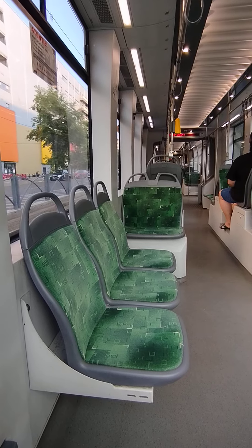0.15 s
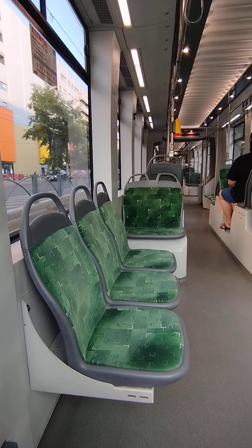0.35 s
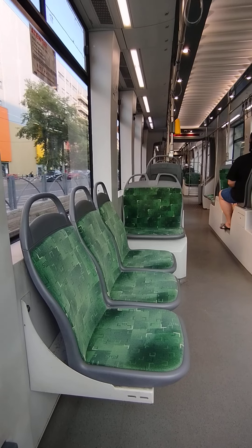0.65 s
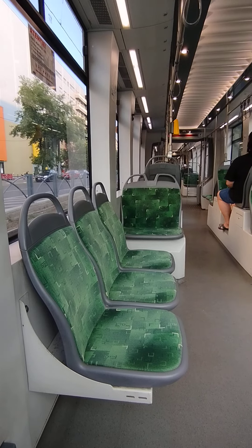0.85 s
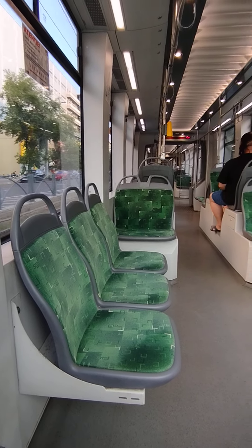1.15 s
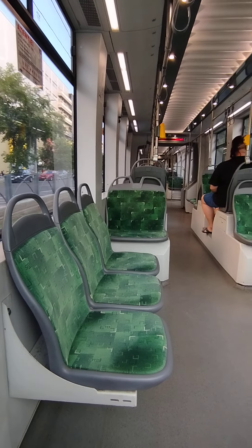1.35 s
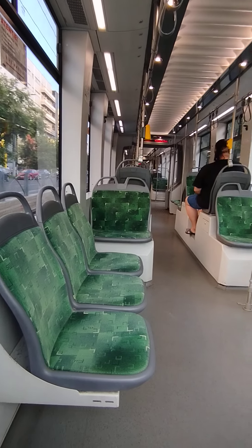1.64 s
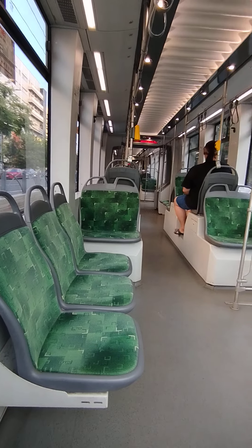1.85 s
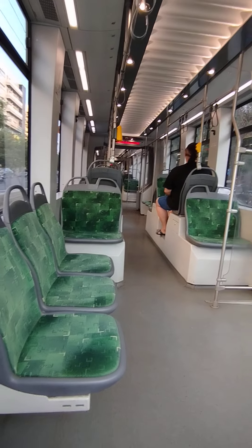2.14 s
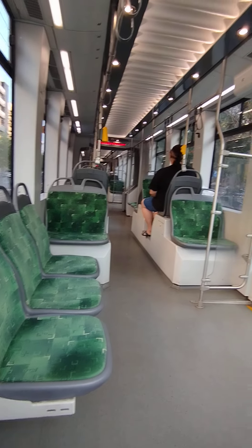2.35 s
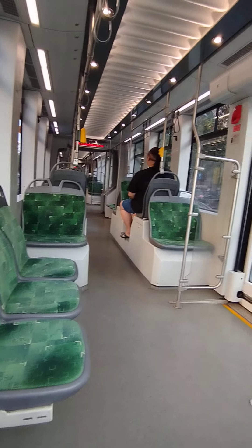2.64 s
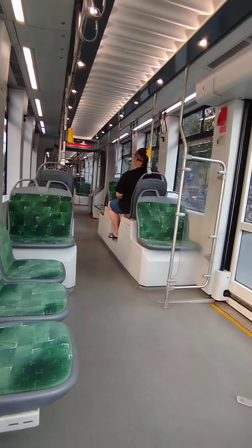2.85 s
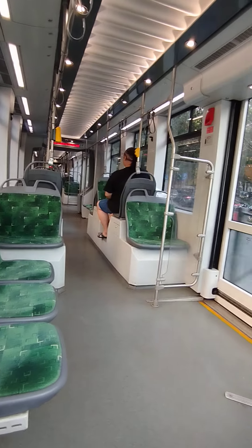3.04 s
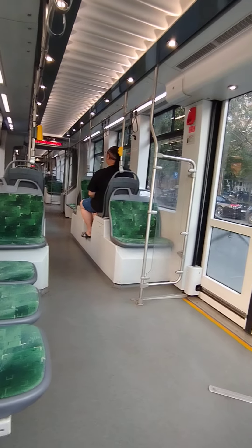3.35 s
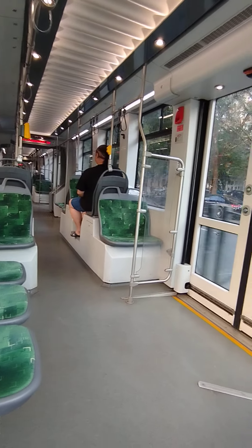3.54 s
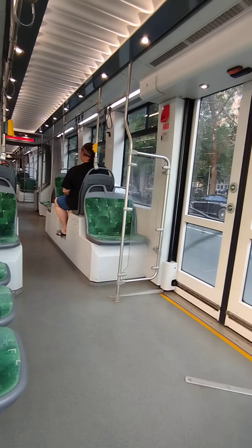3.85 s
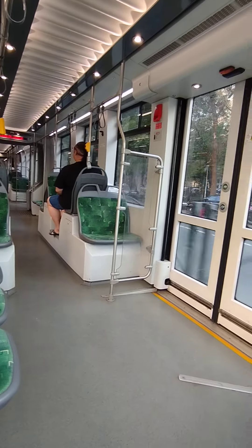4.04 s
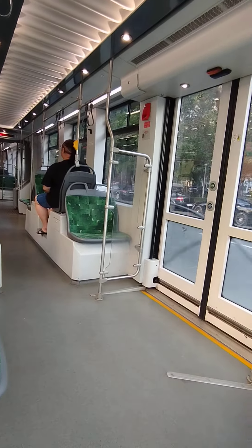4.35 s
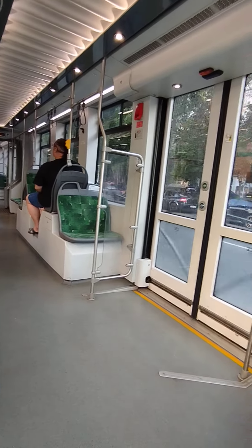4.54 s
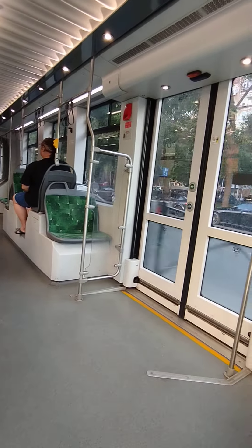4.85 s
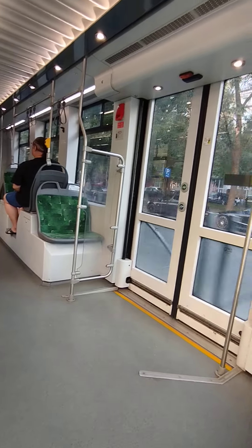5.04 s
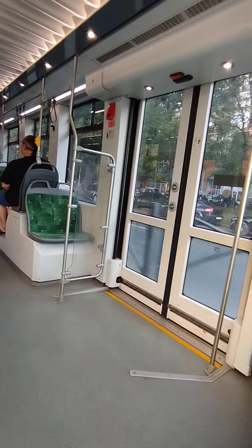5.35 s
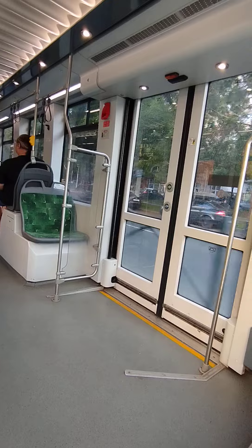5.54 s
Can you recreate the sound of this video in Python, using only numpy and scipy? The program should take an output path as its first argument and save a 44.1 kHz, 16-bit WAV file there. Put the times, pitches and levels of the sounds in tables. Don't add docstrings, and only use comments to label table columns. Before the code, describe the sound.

A handheld phone turns slowly in a quiet tram cabin. Continuous low rolling rumble, wavering deep boom, ceiling air hiss and faint gear and inverter whine fill the space. A rail joint jolts the floor after a second, with scuffing and rattling, then brushing cloth. A high tone comes forward mid-way, a few dry ticks follow, and the motor hum climbs at the end.

```python
import sys
import numpy as np
from scipy import signal
from scipy.fft import rfft, irfft
from scipy.io import wavfile
from scipy.ndimage import uniform_filter1d

SR = 44100
rng = np.random.default_rng(int(sys.argv[2]) if len(sys.argv) > 2 else 0)


def nominal_scale(level):
    x = np.asarray(level, float) / 20
    return 10 ** x


def wrap_up_sound(samples):
    columns = np.atleast_2d(samples).T
    tamed = np.clip(columns, -1, 1)
    steps = np.round(tamed * 32767).astype(np.int16)
    wavfile.write(sys.argv[1], SR, steps)


N = 251811
T = np.arange(N) / SR
F = np.fft.rfftfreq(N, 1 / SR) + 1e-3
SIDES = np.array([[.5], [-.5]])


def curves(table):
    s, *columns = np.transpose(table)
    return [np.interp(T, s, column) for column in columns]


def over_hz(table):
    hz, value = np.transpose(table)
    return np.interp(np.log(F), np.log(hz), value)


def unit(x):
    return x / np.sqrt(np.mean(x ** 2))


def walk(rate, count=1):
    hold = int(SR / rate)
    held = np.repeat(rng.standard_normal((count, N // hold + 1)), hold, axis=1)
    return 1.33 * uniform_filter1d(uniform_filter1d(held, hold), hold)[:, :N]


def bump(hz, octaves):
    return np.cos(np.clip(np.log2(F / hz) / octaves, -1, 1) * np.pi / 2)


def swells(rows):
    return sum(nominal_scale(db) * np.exp(-((T - s) / half) ** 2) for s, db, half in rows)


def resonances(rows):
    return nominal_scale(sum(db * np.exp(-((F - hz) / width) ** 2 * 2) for hz, width, db in rows))


# pitch_hz, correlation (-1 to 1)
PORT_LIKENESS = [(60, 0.99), (130, 0.95), (190, 0.97), (290, 0.71), (640, 0.42), (1410, -0.23),
                 (3100, 0.05), (6820, -0.12), (15000, -0.08)]
# pitch_hz, left_minus_right_db
PORT_BALANCE = [(60, -6), (110, -2), (200, -1), (380, -3), (700, -2.5), (1290, -5), (2380, -3.5),
                (4400, -2), (8120, 1), (15000, 5)]


def diffuse(source):
    likeness = np.clip(over_hz(PORT_LIKENESS), -.99, .999)
    mid, side = rfft(source)
    ports = np.sqrt(1 + likeness) * mid + 2 * SIDES * np.sqrt(1 - likeness) * side
    return ports * nominal_scale(SIDES * over_hz(PORT_BALANCE))


def bed(colour, swell_db, flicker_db):
    spectra = diffuse(rng.standard_normal((2, N))) * nominal_scale(over_hz(colour))
    centres = 2 ** np.arange(np.log2(colour[0][0]), np.log2(colour[-1][0]) + .4, .5)
    swell = uniform_filter1d(walk(3.9, count=len(centres)), 3, axis=0)
    drift_db = swell_db * swell + flicker_db * walk(10, count=len(centres))
    bands = np.array([irfft(spectra * bump(hz, 0.51) ** 2, N) * nominal_scale(db)
                      for hz, db in zip(centres, drift_db)])
    return centres, bands / np.sqrt(np.mean(bands.sum(0) ** 2))


def tone(hz, db, pan_db, fade_db, fade_rate, wander, apart):
    lag = SIDES * apart / 2 + wander * walk(fade_rate, count=2)
    phase = 2 * np.pi * (np.cumsum(hz * np.ones(N)) / SR + rng.random() + lag)
    pan = nominal_scale(SIDES * pan_db) / np.sqrt(np.cosh(pan_db * np.log(10) / 20))
    level = nominal_scale(db + fade_db * walk(fade_rate, count=2))
    return np.sqrt(2) * pan * level * np.sin(phase)


def facing(loudest_s):
    return 2.5 * np.cos(2 * np.pi * (T - loudest_s) / 5)


# pitch_hz, level_db per Hz
VENT_COLOUR = [(1000, 8.5), (1400, 3.5), (1700, -5), (2050, 3), (2600, -3), (3300, -8), (4500, -13.5),
               (5700, -13.5), (7200, -15.5), (9300, -17), (10200, -24), (11600, -25), (13200, -27),
               (14400, -24.5), (15700, -27)]


def vents():
    hiss = bed(VENT_COLOUR, swell_db=.35, flicker_db=.6)[1]
    return hiss.sum(0) * nominal_scale(-44)


CARRIER_HZ = 1800.6
# time_s, field_hz, level_db of its sixth-order torque ripple
FIELD = [(0, 44.35, -45.5), (1.2, 44.3, -46), (2.2, 44.0, -45), (2.8, 43.95, -43), (3.2, 44.05, -44),
         (3.8, 44.6, -48), (4.6, 45.55, -46), (4.95, 45.95, -40), (5.4, 46.35, -38.5), (5.71, 46.8, -38.5)]
# carrier_multiple, field_multiple, level_db, left_minus_right_db, loudest_s
COMB = [(2.0, -8.0, -73.6, -1.8, 0.0), (2.0, -6.0, -70.4, 2.7, 4.6), (2.0, -4.0, -72.5, 5.1, 4.4),
        (2.0, -2.0, -65.5, -2.3, 0.5), (2.0, -1.0, -68, -4.8, 4.4), (2.0, 1.0, -66.8, -5.3, 1.0),
        (2.0, 2.0, -69.5, -2.2, 1.1), (2.0, 4.0, -68, 5.0, 2.8), (2.0, 6.0, -68, -5.7, 1.7),
        (2.0, 8.0, -74.3, 1.8, 2.4), (3.0, -3.0, -72.9, -4.4, 1.7), (3.0, -2.0, -79.8, 8.3, 4.7),
        (3.0, -1.0, -72.3, 4.4, 1.6), (3.0, 1.0, -77, -3.9, 4.7), (3.0, 3.0, -71, -7.2, 2.3),
        (4.0, -8.0, -81.9, -5.9, 3.8), (4.0, -6.0, -73.5, -4.6, 5.4), (4.0, -4.0, -73.9, -3.5, 4.9),
        (4.0, -2.0, -67.7, -6.7, 1.9), (4.0, 0.0, -72.8, -1.3, 2.2), (4.0, 1.0, -74.1, -3.8, 3.7),
        (4.0, 2.0, -69, -3.6, 4.2), (4.0, 4.0, -67.2, -8.0, 1.6), (4.0, 6.0, -74.8, -6.2, 4.1),
        (4.0, 8.0, -73.7, -0.5, 4.2), (5.0, -5.0, -81.0, 0.3, 1.8), (5.0, -3.0, -68.5, 10.4, 1.8),
        (5.0, -1.0, -80.5, 9.0, 1.9), (5.0, 1.0, -82.4, 7.7, 4.6), (5.0, 3.0, -75.0, 1.1, 1.4),
        (5.0, 5.0, -69.5, 16.9, 2.2), (6.0, -8.0, -90.8, 14.5, 4.7), (6.0, -6.0, -87.6, 17.2, 1.8),
        (6.0, -4.0, -85.7, 6.6, 1.8), (6.0, -2.0, -91.7, 8.9, 1.9), (6.0, 2.0, -89.6, 11.0, 0.0),
        (6.0, 4.0, -85.4, 10.8, 1.3), (6.0, 6.0, -88.4, 11.2, 4.9), (8.0, -2.0, -85.7, 7.3, 1.7),
        (8.0, 2.0, -87.9, 7.0, 1.8)]
# pitch_hz, level_db, left_minus_right_db, loudest_s
CONVERTER = [(5851.5, -72.5, -2.5, 0.2), (5954, -83, 0, 3.8), (5988.1, -70, 2.5, 4.4), (6051, -78, 0, 3.6),
             (8062, -80, 0, 2), (9441, -80, 0, 1)]
# time_s, level_db, left_minus_right_db
HUM = [(0, -60, -4), (.15, -58.5, -4), (.36, -61, -4), (.48, -57.5, -1), (.72, -57.5, 0), (.85, -62, -1),
       (1.3, -68, -4), (1.7, -66, -3), (2.1, -58.5, -8), (2.55, -63, -9), (2.95, -58, -5), (3.3, -60, -3),
       (3.7, -63, -5.5), (4.3, -62, -5), (4.6, -59.5, -4), (5.1, -58, -3), (5.4, -57, -2), (5.71, -57, -1)]
# time_s, level_db, left_minus_right_db
SING = [(0, -63.5, 3), (.75, -68.5, 4), (1.2, -60, 9), (1.6, -63.5, 8), (1.95, -65, 8), (2.38, -60.5, 21),
        (2.8, -57, 21), (3.15, -59.5, 20), (3.6, -71, 3), (4.15, -70, -12), (4.8, -65.5, 1), (5.2, -63, 2),
        (5.71, -62, 1)]


def inverter():
    field_hz = curves(FIELD)[0]
    out = np.zeros((2, N))
    for carriers, fields, db, pan_db, loudest_s in COMB:
        hz = carriers * CARRIER_HZ + fields * field_hz
        out += tone(hz, db - 1 + facing(loudest_s), pan_db, 1.2, 1.5, wander=.03, apart=.4)
    for hz, db, pan_db, loudest_s in CONVERTER:
        out += tone(hz, db + facing(loudest_s), pan_db, 1, 1.2, wander=.04, apart=.3)
    for table, hz, fade_db in (HUM, 2 * CARRIER_HZ, 1.4), (SING, 2 * CONVERTER[2][0], .7):
        db, pan_db = curves(table)
        out += tone(hz, db, pan_db, fade_db, fade_rate=40, wander=.02, apart=.4)
    return out


# time_s, tooth_rate_hz, load_db, near_over_far_bogie_db
MESH = [(0, 271, -2, 2), (.4, 270.8, -1, 3), (1.1, 270.3, -1, 0), (1.6, 268.5, 0, -2), (2.5, 268, 0.5, 0),
        (3.4, 268.8, 1, 1), (3.7, 269.5, -3, 1), (4, 271, -3.5, -6), (4.5, 274.5, -8, 1), (5, 279.5, 2, 0),
        (5.71, 284.5, 4.5, 3)]


def gears():
    tooth_hz, load_db, near_db = curves(MESH)
    field_hz, ripple_db = curves(FIELD)
    far_share = .9655
    orders = [(6 * field_hz, ripple_db),
              (18 * field_hz, -57 + facing(1.8)),
              (3 * tooth_hz, -50 + .4 * load_db + near_db),
              (3 * far_share * tooth_hz, -52 - near_db)]
    return sum(tone(hz, db - 1, -2.5, 1.2, 4, wander=.02, apart=.15) for hz, db in orders)


# start_s, level_db, pitch_hz, bright_minus_peak_db, left_minus_right_db
TICKS = [(3.2958, -29, 690, -17, -6), (3.3200, -41, 1500, -12, -4), (3.3714, -34.5, 2900, 2, -7.5),
         (3.3716, -34, 1150, -40, -8), (3.5100, -37, 1600, -26, -5.5), (3.9302, -35, 2100, -40, -7),
         (4.5094, -43, 2200, -14, -3), (4.6962, -42, 2000, -20, -2.5), (5.0908, -41, 2050, -21, -3)]


def ticks():
    t = T[:int(.08 * SR)]
    out = np.zeros((2, N + len(t)))
    tails = rng.standard_normal((len(TICKS), 2, len(t)))
    for (s, db, hz, bright_db, pan_db), tail in zip(TICKS, tails):
        snap = np.sin(2 * np.pi * hz * t) * np.exp(-t * hz * .9)
        edge = nominal_scale(bright_db) * np.sin(2 * np.pi * 6800 * t) * t / .0001 * np.exp(-t / .0001)
        echo = nominal_scale(-19) * uniform_filter1d(tail, 6) * np.exp(-t / .012)
        start = int(s * SR)
        out[:, start:start + len(t)] += nominal_scale(db + 8.5 + SIDES * pan_db) * (snap + edge + echo)
    return out[:, :N]


# centre_hz, half_width_octaves, level_db
SCUFFS = [(.02, -45, 0.0083, 0.046), (1.2, -46, 0.078, 0.24), (1.32, -45, 0.0057, 0.054),
          (2.72, -45, 0.044, 0.13), (5.1, -48.5, 0.067, 0.077)]
SCUFF_BANDS = [(1740, 1.44, -10.5), (1460, 1.02, -5)]
WASHES = [(1.3, -55, .3, 0.39), (1.318, -45.5, .006, 0.039), (1.39, -70, 0.021, 0.028),
          (1.82, -50, 0.013, 0.016), (3.5, -58, .02, 0.042), (4.01, -54, 0.014, 0.05),
          (4.77, -56, .01, .02)]
WASH_BANDS = [(5100, 1.27, 0.1)]
BRUSHES = [(1.515, -56, .01, 0.025), (1.63, -53.5, 0.012, 0.077), (1.734, -45, 0.0023, 0.015),
           (1.755, -49, .008, 0.023), (1.79, -48, 0.013, 0.033), (1.853, -51, .005, .03),
           (3.479, -57.5, 0.0038, 0.057), (4.17, -60, 0.0095, .02), (4.45, -60, .04, .068),
           (5.7, -62, 0.011, 0.034)]
BRUSH_BANDS = [(7850, 0.61, -5.5), (9353, 0.27, -4.5), (12000, 0.16, -15), (13800, 0.26, -13),
               (4630, 0.99, -3.5)]
CHATTERS = [(1.2, -53, .05, .06), (1.26, -54, .04, .05), (1.319, -44, .004, .06), (1.372, -54, .01, .01),
            (2.05, -56, .05, .15), (2.79, -55, .02, .03), (3.05, -54, .12, .25), (5.1, -56, .05, .08)]
CHATTER_BANDS = [(2001, 0.23, -1.5), (2280, .9, -8.5)]
SQUEAKS = [(1.82, -50, 0.0046, 0.013)]
SQUEAK_BANDS = [(4900, 0.38, 0.1)]


def stroke(s, db, rise, fall):
    shape = np.where(T < s, ((s - T) / rise) ** 2, np.abs((T - s) / fall) ** 1.37)
    return nominal_scale(db) * np.exp(-shape)


def rustle():
    size_db = 1.7 * rng.exponential(size=(2, N // 60 + 1)).repeat(60, axis=1)[:, :N]
    spectra = diffuse(rng.standard_normal((2, N)) * nominal_scale(size_db))
    kinds = [(SCUFFS, SCUFF_BANDS), (WASHES, WASH_BANDS), (BRUSHES, BRUSH_BANDS),
             (CHATTERS, CHATTER_BANDS), (SQUEAKS, SQUEAK_BANDS)]
    out = 0
    for strokes, bands in kinds:
        sound = sum(nominal_scale(db) * unit(irfft(spectra * bump(hz, octaves), N)) for hz, octaves, db in bands)
        out = out + sound * sum(stroke(*row) for row in strokes)
    return out


# peak_s, level_db, half_length_s
THUMPS = [(0.0, -61, 0.14), (0.131, -61.4, 0.054), (0.938, -58.9, 0.07), (1.038, -47, 0.041),
          (1.147, -53.5, 0.025), (1.215, -46, 0.02), (1.301, -49.6, 0.028), (1.364, -43, 0.024),
          (1.441, -41, 0.034), (1.526, -63, 0.023), (1.772, -60, 0.06), (2.057, -61, 0.036),
          (4.79, -66, 0.112), (5.568, -62, 0.032), (5.71, -45, 0.028)]


def thumps():
    mid, side = (unit(irfft(rfft(rng.standard_normal(N)) * bump(44, 0.64), N)) for _ in range(2))
    return (mid + 2 * SIDES * nominal_scale(-23) * side) * (nominal_scale(-79) + swells(THUMPS))


# pitch_hz, level_db per Hz
ROLL_COLOUR = [(41, -61), (70, -76), (80, -42), (90, -11), (108, -12), (121, -9), (134, -9), (167, -10.5),
               (222, -13.5), (250, -14.5), (275, -16), (321, -17), (353, -16), (583, -19.5), (797, -20),
               (900, -29), (1800, -40), (2340, -67), (3960, -120)]
# peak_s, level_db re steady roll, half_length_s
JOINTS = [
    (.3, -15, 0.19),
    (1.22, 0.5, 0.12),
    (1.7, -27, 0.41),
    (2.7, -13, 0.024),
    (5.15, -19, 0.052),
    (5.7, -20, 0.22),
]
# pitch_hz, width_hz, gain_db
CAR_MODES = [(199, 4.7, 3), (226, 12.4, -7), (274, 9, -3.5), (303, 24, 1.5), (322, 9.8, -2.5),
             (418, 10.5, 3), (443, 8.6, -2.5), (459, 15, 3), (498, 7.8, 0), (598, 25, -2.5), (629, 9, 6),
             (710, 33, 3.5), (770, 16, 0.5), (806, 11, -3)]


def wheels():
    rough = swells(JOINTS)
    centres, bands = bed(ROLL_COLOUR, swell_db=.5, flicker_db=.7)
    upper_share = np.clip(np.log2(centres / 250), 0, 1)[:, None, None]
    low, upper = (bands * (1 - upper_share)).sum(0), (bands * upper_share).sum(0)
    low, upper = irfft(rfft([low, upper]) * resonances(CAR_MODES), N)
    low = unit(low) * nominal_scale(-33) * (1 + nominal_scale(-2) * rough)
    upper = unit(upper) * nominal_scale(-36.83) * (1 + nominal_scale(-1.5) * rough)
    return low + upper


def ring(kicks, rest_db, nudge_hz, side_db, pan_db):
    s, db, half, hz = np.transpose(kicks)
    size = nominal_scale(rest_db) + swells(zip(s, db, half))
    phase = 2 * np.pi * np.cumsum(np.interp(T, s, hz) + nudge_hz * walk(30)[0]) / SR
    mid = np.sqrt(2) * nominal_scale(0.35 * walk(40)[0]) * np.sin(phase)
    side = nominal_scale(side_db) * unit(irfft(rfft(rng.standard_normal(N)) * bump(hz.mean(), 0.28), N))
    return size * (mid * nominal_scale(SIDES * pan_db) + 2 * SIDES * side)


# peak_s, level_db, half_length_s, pitch_hz
BOOM_KICKS = [(0.057, -32.5, 0.026, 108.8), (0.308, -36, 0.033, 115.5), (0.408, -35, 0.019, 108.8),
              (0.683, -43, 0.022, 108.4), (0.839, -36, 0.12, 110.6), (1.027, -37, 0.022, 109.8),
              (1.082, -38, 0.016, 112.6), (1.143, -39, 0.024, 108.4), (1.211, -35, 0.023, 105.6),
              (1.367, -28, 0.033, 107), (1.451, -32.5, 0.025, 110), (1.544, -24, 0.028, 112),
              (1.658, -35.3, 0.017, 110), (1.717, -32, 0.022, 110), (1.769, -36.5, 0.038, 108.6),
              (1.862, -23, 0.036, 106), (1.93, -27.5, 0.033, 111.2), (1.989, -27, 0.019, 112),
              (2.05, -37, 0.024, 113), (2.143, -35.5, 0.03, 110), (2.215, -30.5, 0.027, 111.8),
              (2.293, -38, 0.021, 108.6), (2.449, -32.9, 0.051, 112), (2.617, -39, 0.018, 108.8),
              (2.68, -26, 0.03, 108), (2.73, -29.5, 0.031, 108.8), (2.823, -28.5, 0.032, 108),
              (2.955, -41, 0.039, 110.5), (3.039, -31.5, 0.039, 111.5), (3.156, -32, 0.038, 106.7),
              (3.229, -27.5, 0.038, 109.6), (3.322, -30.5, 0.027, 104.5), (3.424, -34, 0.022, 112.7),
              (3.621, -30.5, 0.05, 107), (3.723, -32.5, 0.026, 105), (3.766, -35.0, 0.023, 105),
              (3.982, -34, 0.039, 109.1), (4.181, -36, 0.03, 113.2), (4.24, -31, 0.033, 109),
              (4.345, -30.5, 0.033, 106.7), (4.662, -30, 0.078, 110.5), (4.83, -36, 0.037, 106),
              (4.95, -22, 0.028, 109), (5.283, -29, 0.036, 109.2), (5.401, -31, 0.029, 111.3),
              (5.447, -37, 0.02, 110), (5.512, -38, 0.023, 108), (5.571, -32, 0.029, 104.5),
              (5.628, -29, 0.03, 109), (5.692, -28.5, 0.021, 107.2)]
# peak_s, level_db, half_length_s, pitch_hz
FLOOR_KICKS = [(0.113, -33.5, 0.04, 163.5), (0.24, -36.6, 0.024, 164.5), (0.454, -33, 0.024, 166.1),
               (0.816, -29, 0.018, 164.9), (0.927, -38.7, 0.022, 183.9), (1.041, -31.5, 0.026, 176),
               (1.102, -30, 0.019, 177), (1.184, -41, 0.026, 169.3), (1.268, -32, 0.063, 172),
               (1.388, -38, 0.016, 174), (1.435, -33, 0.022, 176.4), (1.624, -36, 0.022, 163.2),
               (1.667, -32, 0.015, 182.3), (1.719, -32, 0.021, 178), (1.828, -38, 0.041, 185),
               (1.907, -33, 0.016, 192.4), (1.946, -34.5, 0.017, 198.5), (1.973, -42, 0.015, 178.2),
               (2.018, -31.5, 0.023, 163), (2.066, -35.2, 0.018, 171.1), (2.147, -39, 0.018, 173),
               (2.295, -34.8, 0.024, 159.6), (2.451, -45, 0.02, 173), (2.839, -35, 0.022, 169.2),
               (2.893, -32, 0.016, 170), (3.032, -46, 0.016, 172.8), (3.197, -32, 0.021, 162.7),
               (3.261, -38.0, 0.029, 169), (3.356, -40, 0.016, 160.3), (3.816, -36.8, 0.016, 164.6),
               (3.85, -37, 0.017, 172), (3.961, -35, 0.027, 158), (4.399, -33, 0.016, 171.6),
               (4.633, -34.9, 0.018, 180), (4.798, -34, 0.026, 183), (5.0, -33, 0.026, 150.6),
               (5.145, -31.5, 0.016, 162), (5.181, -35, 0.022, 161), (5.259, -42, 0.016, 170.8),
               (5.345, -39, 0.022, 174.5), (5.463, -39, 0.03, 173), (5.508, -32, 0.018, 161.5),
               (5.587, -44, 0.015, 168), (5.624, -38, 0.018, 175.2), (5.655, -35, 0.019, 166.7)]


def boom():
    body = ring(BOOM_KICKS, rest_db=-40, nudge_hz=2.4, side_db=-26.5, pan_db=-0.35)
    floor = ring(FLOOR_KICKS, rest_db=-46.5, nudge_hz=7.92, side_db=-28, pan_db=-1.5)
    return body + floor


def scene():
    air = vents() + inverter() + gears() + ticks() + rustle() + wheels() + boom()
    bass_cut = 1 / np.sqrt(1 + (87.8 / F) ** 22)
    return irfft(rfft(air) * bass_cut, N) + thumps()


# pitch_hz, width_hz, gain_db
TREBLE_NOTCHES = [(6200, 280, -9), (8350, 450, -3.5), (10150, 450, -4), (11500, 400, -5), (12340, 300, -15),
                  (12750, 600, -8)]


def band_limit(x):
    return signal.sosfilt(signal.butter(12, 15830, fs=SR, output="sos"), x)


def record(dry):
    mix = irfft(rfft(dry) * resonances(TREBLE_NOTCHES) * (F < 15775), N)
    return band_limit(mix)


dry = scene()
out = record(dry)
wrap_up_sound(out)
```